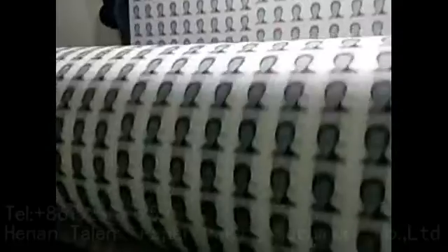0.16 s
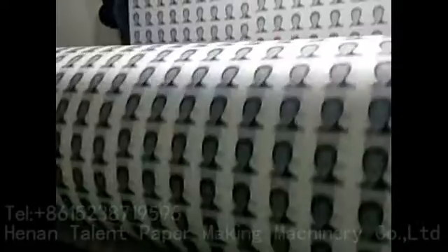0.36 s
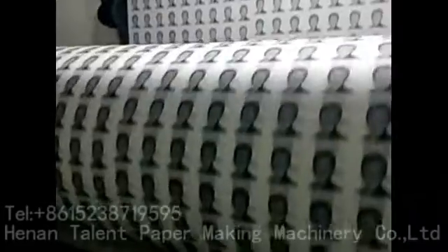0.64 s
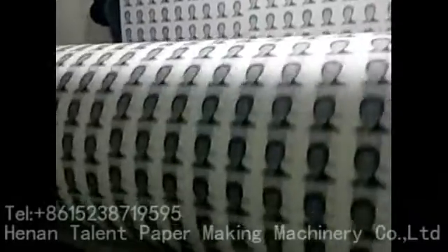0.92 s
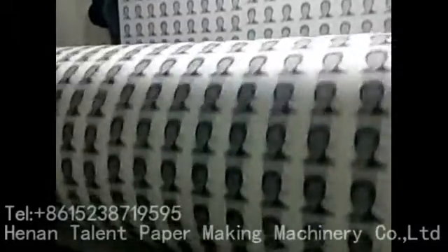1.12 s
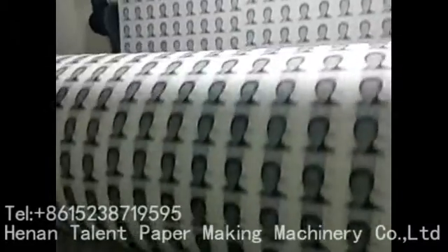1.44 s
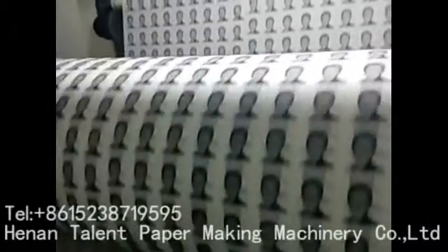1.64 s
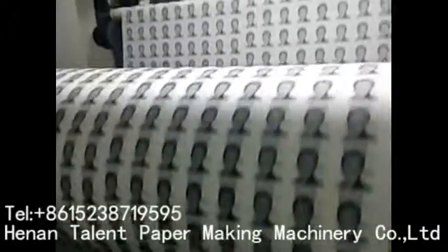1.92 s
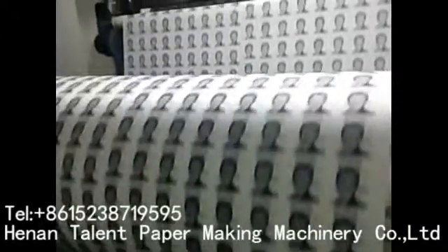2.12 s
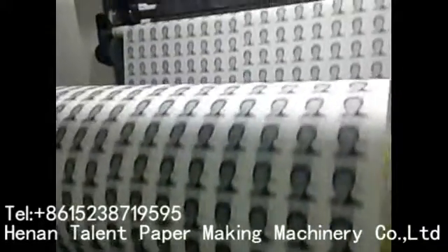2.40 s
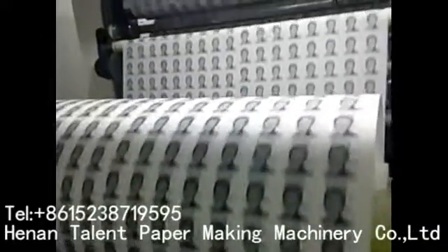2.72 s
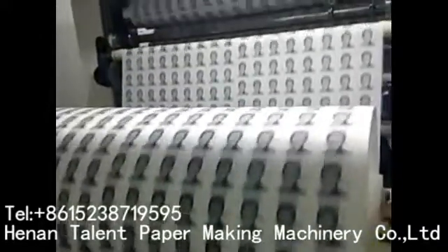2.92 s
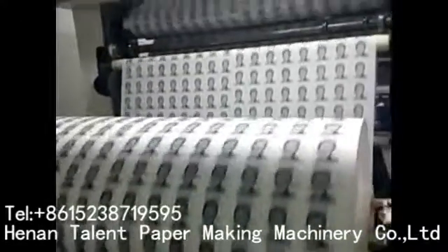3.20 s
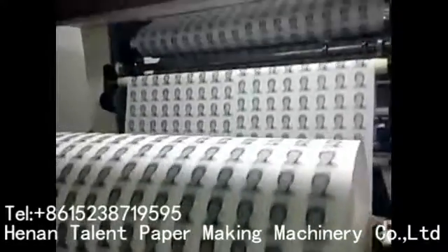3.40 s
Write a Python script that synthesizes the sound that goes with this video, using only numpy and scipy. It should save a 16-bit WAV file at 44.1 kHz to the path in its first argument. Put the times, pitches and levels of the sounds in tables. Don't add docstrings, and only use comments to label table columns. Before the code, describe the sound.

A large printing machine roars continuously in a factory hall. After about 0.1 seconds of silence it fades in by 0.2, with dense low rumble, rushing rollers, paper and air, ringing panels and a steady mid-low blower hum. Two thin high whines beat together, strongest before 1.3 seconds, then weaker and wavering. Gear noise dulls gradually until 3.5. The handheld sound is nearly mono, its treble patchy and watery.

```python
import sys
import numpy as np
from scipy import signal
from scipy.fft import rfft, irfft, next_fast_len
from scipy.io import wavfile
from scipy.ndimage import uniform_filter1d, map_coordinates

SR = 44100
rng = np.random.default_rng(int(sys.argv[2]) if len(sys.argv) > 2 else 0)


def persist_wave(psi):
    counts = np.round(np.clip(psi, -1, 1) * 32767).astype(np.int16)
    wavfile.write(sys.argv[1], SR, np.atleast_2d(counts).T)


def voltage_ratio(decibels):
    exponent = np.asarray(decibels, float) / 20
    return 10 ** exponent


N = 156555

# time in seconds, pitch in Hz, level in dB.
MOTOR_HUM = [(.1, 392.6, -19.5), (.4, 394.4, -18.5), (.62, 392.5, -23.5), (.9, 395, -20),
             (1.25, 394.4, -20), (1.55, 392.3, -28), (1.8, 393, -24), (1.97, 393.3, -20.5),
             (2.3, 392.2, -28), (2.5, 392, -28.5), (2.8, 391.8, -22.5), (3.15, 389.6, -27.5),
             (3.3, 391.4, -25.5), (3.55, 392, -22)]
# pitch in Hz, width in Hz, level in dB rms.
PANEL_RINGS = [(137.4, 11.6, -32.5), (161, 17, -32.5), (239.1, 9, -34), (315, 24, -35.5),
               (694.2, 20, -38.5), (822.6, 18, -41), (1011, 19, -44.5), (1376, 40, -47.5), (1982, 44, -45),
               (2700, 160, -44), (4230, 20, -64), (5070, 54, -47)]
# time in seconds, lower whine in Hz, gap up to the other in Hz, lower dB, upper dB.
MOTOR_WHINES = [(.1, 4708.3, 16, -31, -30), (.6, 4708, 16, -31, -30), (.8, 4708, 17.3, -29, -32),
                (.95, 4704, 20.3, -30, -33), (1.2, 4698.5, 20.3, -33, -34), (1.33, 4699, 17, -33, -34),
                (1.44, 4697, 16, -42, -36), (1.58, 4697, 14.8, -30, -37), (1.71, 4697, 14.8, -30, -39),
                (1.79, 4699, 16, -42, -40), (1.9, 4698, 18.5, -32, -38), (2.08, 4701, 18.5, -43, -41),
                (2.2, 4700, 16.3, -36, -38), (2.35, 4699.5, 16.2, -35, -39), (2.7, 4698, 16.3, -39, -46),
                (2.95, 4695, 17, -48, -49), (3.3, 4698, 17, -37, -41), (3.55, 4700, 16, -37, -40)]
# multiple of the whine, lower motor in dB, upper motor in dB.
MOTOR_ORDERS = [
    (1 / 4, -44.5, -58.5),
    (1 / 2, -44, -54),
    (2, -67, -61),
]
# time in seconds, level of the roar in dB.
FACING_MACHINE = [
    (0.25, -26),
    (0.3, -26.5),
    (0.79, -25.5),
    (1.95, -27.5),
    (3.54, -28),
    (3.55, -32),
]
# pitch in Hz, level in dB per Hz.
RUMBLE_COLOUR = [(15, -46), (25, -28), (54, -1.5), (107, -2.5), (145, -3.5), (208, -2.5), (244, -0.5),
                 (354, -9.5), (370, -5), (480, -32.5), (810, -120)]
ROAR_COLOUR = [(190, -30), (330, -6), (392, -7.5), (442, -6.5), (515, -9.5), (785, -11), (904, -13),
               (1020, -11), (4400, -20.5), (5720, -32), (9680, -120)]
GEAR_COLOUR = [(1200, -16.5), (1800, -3), (2700, -0.5), (3200, -4), (4200, -2.5), (5200, -15.5)]
AIR_COLOUR = [(3500, -9.5), (4400, -3.5), (5200, -0.5), (5700, -2.5), (6500, -0.5), (8000, -14),
              (10500, -18.5), (13700, -30.5)]
# pitch in Hz, level in dB per Hz.
SIDE_COLOUR = [(600, -11), (4000, -7), (7500, -7), (10500, -1), (13500, -16)]
# start in seconds, length in seconds.
DULL_MOMENTS = [(.13, .02), (.19, .02), (.28, .06), (.425, .025), (.655, .015), (.865, .02), (.95, .015),
                (1.18, .015), (1.955, .035), (2.865, .01)]
# pitch in Hz, usual level over the rounding step in dB.
ROUNDING_FINENESS = [(5000, 24), (6900, 17), (7900, 3), (9600, -1), (11000, -2), (12500, -3), (13800, -5)]


def unit(x):
    return x / np.sqrt(np.mean(x ** 2) + 1e-20)


def curves(rows):
    s, *columns = np.transpose(rows)
    return [np.interp(np.arange(N) / SR, s, column) for column in columns]


def wobble(rate):
    knots = rng.standard_normal(int(N * 40 / SR) + 4)
    return map_coordinates(knots, [np.arange(N) * min(rate, 40) / SR])


def filtered(x, response):
    m = next_fast_len(N + 8192)
    return irfft(rfft(x, m) * response(np.fft.rfftfreq(m, 1 / SR)), m)[:N]


def rush(colour, patchy_db):
    z = signal.stft(rng.standard_normal(N), nperseg=512)[2]
    patches = uniform_filter1d(rng.standard_normal(z.shape), size=5, axis=0)
    patches = uniform_filter1d(patches, size=12, axis=1)
    x = signal.istft(z * voltage_ratio(patchy_db * unit(patches)), nperseg=512)[1][:N]
    f, db = np.transpose(colour)
    return unit(filtered(x, lambda hz: voltage_ratio(np.interp(np.log(hz + 1), np.log(f + 1), db, -120, -120))))


def tone(hz, db, turns=0):
    return np.sqrt(2) * voltage_ratio(db) * np.sin(2 * np.pi * (np.cumsum(hz) / SR + turns))


def side_hiss():
    return voltage_ratio(-67) * rush(SIDE_COLOUR, patchy_db=9)


def motor_hum():
    hz, db = curves(MOTOR_HUM)
    hum = tone(hz, db + 0.35 * wobble(13))
    octave = tone(783.5 + 1.44 * wobble(3.05), -41.5 + 4.0 * wobble(3.66))
    return hum + octave


def ring(centre, width):
    def response(f):
        return (1j * f * width / (centre * centre - f * f + 1j * f * width)) ** 2
    return unit(filtered(rng.standard_normal(N), response))


def panels():
    return sum(voltage_ratio(db + 0.72 * wobble(2.5)) * ring(hz, width) for hz, width, db in PANEL_RINGS)


def motors():
    hz, gap, lower_db, upper_db = curves(MOTOR_WHINES)
    lower = tone(hz, lower_db + .7 * wobble(9))
    upper = tone(hz + gap, upper_db + .7 * wobble(9), turns=.62)
    out = lower + upper
    for multiple, a_db, b_db in MOTOR_ORDERS:
        out += tone(multiple * hz, a_db + 1.3 * wobble(4.3))
        out += tone(multiple * (hz + gap), b_db + 4.2 * wobble(3.8))
    return out


def printing_machine():
    turn_db, = curves(FACING_MACHINE)
    turn_db = turn_db - turn_db.mean() + .15 * wobble(3)
    rumble = voltage_ratio(-24.5 + 0.57 * turn_db + .5 * wobble(5)) * rush(RUMBLE_COLOUR, patchy_db=.7)
    roar = voltage_ratio(-23.5 + 0.36 * turn_db + 0.61 * wobble(7)) * rush(ROAR_COLOUR, patchy_db=0.57)
    gears = voltage_ratio(-32.5 + 4 * turn_db + 0.65 * wobble(4.6)) * rush(GEAR_COLOUR, patchy_db=1.5)
    air = voltage_ratio(-31 + 0.4 * turn_db + 0.22 * wobble(6.13)) * rush(AIR_COLOUR, patchy_db=0.62)
    return rumble + roar + gears + air


def scene():
    side = side_hiss()
    mid = motor_hum() + panels() + motors() + printing_machine()
    return np.array([mid + side, mid - side])


def rough_treble(x):
    size, grid = 1024, 616
    count, k, n = N // size + 3, np.arange(size), np.arange(2 * size)
    basis = np.cos(np.pi / size * (k[:, None] + .5) * (n + .5 + size / 2)) * np.sqrt(2 / size)
    basis *= signal.windows.kaiser_bessel_derived(2 * size, 4 * np.pi)
    lead = size - grid
    at = np.arange(count)[:, None] * size + n
    lines = np.pad(x, (lead, 5 * size))[at] @ basis.T
    hz, t = (k + .5) * SR / 2 / size, (at[:, size] - lead) / SR

    usual = np.sqrt(uniform_filter1d(np.mean(lines ** 2, axis=0), size=40))
    patches = uniform_filter1d(rng.standard_normal((count, size // 4)), size=3, axis=0)
    patches = uniform_filter1d(patches, size=2, axis=1)
    patch_db, frame_db = 9, 2
    scatter_db = patch_db * np.repeat(unit(patches), repeats=4, axis=1)
    scatter_db = scatter_db + frame_db * rng.standard_normal((count, 1))
    step = usual * voltage_ratio(scatter_db - np.interp(hz, *np.transpose(ROUNDING_FINENESS))) + 1e-12

    top = 13800 - 520 * uniform_filter1d(rng.exponential(size=count), size=2)
    for s, length in DULL_MOMENTS:
        top[abs(t - s - length / 2) < length / 2 + .012] = 11350
    silent_below = .6
    rounded = np.floor(abs(lines) / step + 1 - silent_below) * step
    lines = np.sign(lines) * rounded * (hz < top[:, None])
    return np.bincount(at.ravel(), (lines @ basis).ravel())[lead:lead + N]


def top_cut(x):
    return signal.sosfilt(signal.butter(12, 13740, fs=SR, output="sos"), x)


def record(dry):
    open_s, fade_s, fade_db = .1158, 0.09, -17
    u = (np.arange(N) / SR - open_s) / fade_s
    left, right = dry * voltage_ratio(fade_db * np.clip(1 - u, 0, 1))
    mid = rough_treble((left + right) / 2)
    side = (left - right) / 2
    mix = (u > 0) * np.array([mid + side, mid - side])
    return top_cut(mix)


dry = scene()
out = record(dry)
persist_wave(out)
```